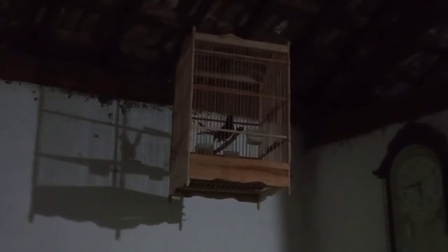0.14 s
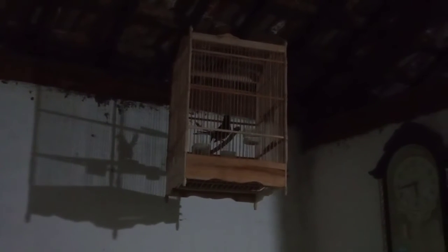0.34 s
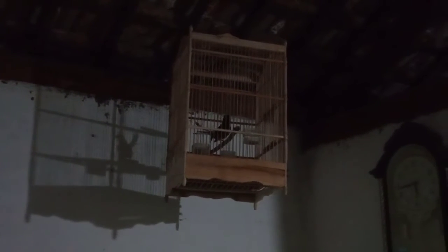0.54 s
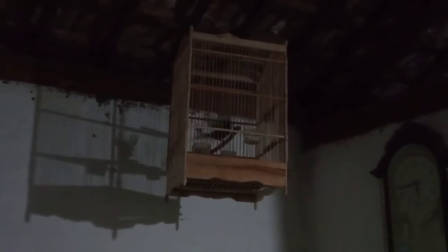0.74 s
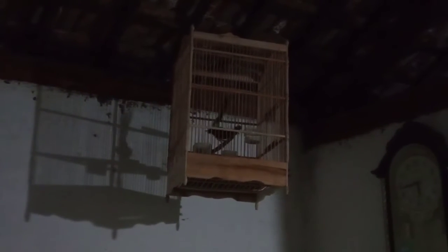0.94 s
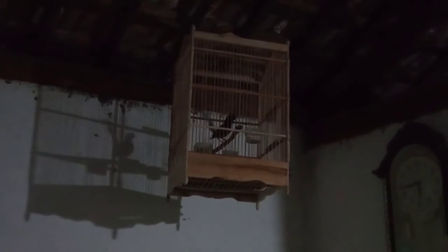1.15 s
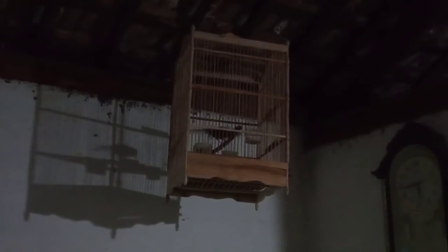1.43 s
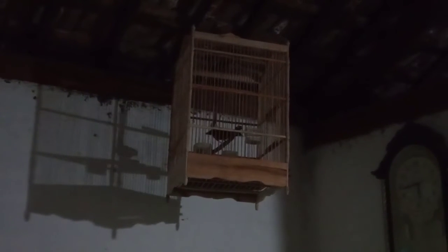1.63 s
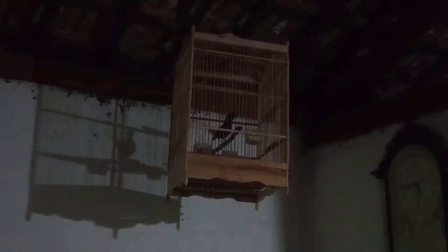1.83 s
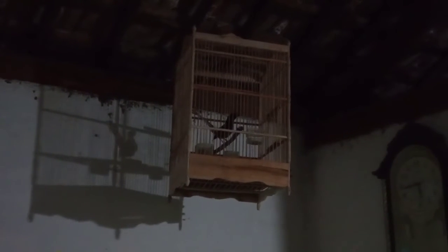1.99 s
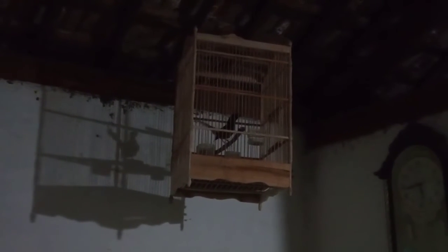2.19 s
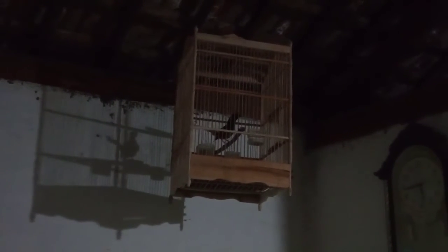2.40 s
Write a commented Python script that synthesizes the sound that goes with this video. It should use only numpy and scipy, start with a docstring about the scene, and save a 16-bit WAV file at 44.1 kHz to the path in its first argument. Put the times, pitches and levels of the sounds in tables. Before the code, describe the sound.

Small cage bird indoors, snapping tak-like chirps mixed with short whistled notes, faint insect pulsing behind

```python
"""A bare, echoing room at night, with a small caged bird.
The bird gives a run of sharp, dry "tak" chirps: bursts of grainy noise, each with a short bright ring.
Between them it whistles soft notes, near sines whose pitch is bent and warbled, some purer than others.
An insect pulses faintly and high in shaped noise, over a low rumble, steady hiss and a thin sizzle."""
import sys
import numpy as np
from scipy import signal
from scipy.fft import rfft, irfft
from scipy.io import wavfile

SR = 44100
rng = np.random.default_rng(int(sys.argv[2]) if len(sys.argv) > 2 else 0)


def store_wav(level_fs):
    """Save 16-bit WAV to argv[1]."""
    pcm = np.round(np.clip(np.atleast_2d(level_fs), -1, 1) * 32767)
    wavfile.write(sys.argv[1], SR, pcm.T.astype(np.int16))


N = 112454
TIME = np.arange(N) / SR
FREQS = np.maximum(np.fft.rfftfreq(N, 1 / SR), 1)
CUTOFF_HZ = 15750  # top of the sound


def from_db(db):
    """Decibels to gain."""
    return 10 ** (np.asarray(db) / 20)


def rms_one(x):
    """Scale to unit power."""
    return x / np.sqrt(np.mean(x ** 2) + 1e-20)


def at_hz(points, hz):
    """Read a table on a log-frequency axis."""
    f, value = np.transpose(points)
    return np.interp(np.log(hz), np.log(f), value)


def noise(gains):
    """Steady noise with the given gain per frequency; unit power."""
    return rms_one(irfft(rfft(rng.standard_normal(N)) * gains, N))


def noise_band(centre_hz, width_hz):
    """Unit-power noise under a bell-shaped curve around one frequency."""
    return noise(np.exp(-2 * ((FREQS - centre_hz) / width_hz) ** 2))


def below(hz):
    """Smooth gain curve: one well under the corner, half at it, near zero well above."""
    return 1 / (1 + (FREQS / hz) ** 6)


def hiss():
    """Faint steady noise with a fixed colour."""
    # colour of the hiss: pitch_hz [Hz], relative level_db [dB per Hz]
    hiss_colour = [(400, -11.5), (900, -25), (2000, -26), (2800, -24.5), (4000, -10.5), (5000, -16.5),
                   (5900, -4), (7300, -9), (8400, -29), (9600, -16), (13000, -27.5), (16000, -36.5)]
    return from_db(-68.5) * noise(from_db(at_hz(hiss_colour, FREQS)))


def rumble():
    """Low noise whose overlapping bands swell and sink independently, under one overall level curve."""
    # colour of the rumble: pitch_hz [Hz], relative level_db [dB per Hz]
    rumble_colour = [(25, -46), (50, -20.5), (110, 1), (160, 1.5), (220, 1), (350, 1.5), (500, -24.5),
                     (800, -54), (2000, -51)]
    # overall level of the rumble: time_s [s], level_db [dB]
    rumble_level = [(0.0, -63.5), (0.11, -78.5), (0.26, -61.5), (0.51, -67), (0.55, -85.5), (0.75, -63),
                    (0.82, -76), (0.93, -65.5), (1.33, -84.5), (1.38, -67), (1.9, -66), (2.11, -78),
                    (2.43, -64), (2.55, -65.5)]
    swing_db, swings_up_to_hz = 4, 6
    coloured = rfft(rng.standard_normal(N)) * from_db(at_hz(rumble_colour, FREQS))
    centres = np.linspace(40, 600, 13)
    bands = 0
    for pick in np.eye(len(centres)):
        band = irfft(coloured * np.interp(FREQS, centres, pick), N)
        bands = bands + band * from_db(swing_db * noise(below(swings_up_to_hz)))
    level_db = np.interp(TIME, *np.transpose(rumble_level))
    return from_db(level_db) * rms_one(bands)


def sizzle():
    """A thin band of high hiss, clearest at the start."""
    # level of the sizzle: time_s [s], level_db [dB]
    sizzle_level = [(0, -73), (.2, -72), (.32, -83), (2.55, -78)]
    level_db = np.interp(TIME, *np.transpose(sizzle_level))
    return from_db(level_db) * noise_band(9530, 540)


def insect():
    """A faint high rasp: coloured noise that swells about five times a second, the pulses added as power."""
    # insect pulses: start_s [s], level_db [dB]
    insect_pulses = [(-.17, -53), (0.0, -52.5), (0.222, -50.5), (0.428, -51), (.64, -54.5), (.845, -53.5),
                     (1.05, -56.5), (1.247, -52), (1.46, -50.5), (1.671, -54.5), (1.877, -54.5),
                     (2.09, -57), (2.298, -49), (2.51, -45)]
    # colour of the rasp: pitch_hz [Hz], relative level_db [dB per Hz]
    insect_colour = [(2500, -43), (4000, -8), (5200, -28), (5600, 12.5), (5880, 22), (6120, 8.5),
                     (6450, -64), (7400, -3.5), (8400, -52.5), (9600, -19), (10900, -17), (11800, -2),
                     (12800, -33), (16000, -50)]
    attack_s, hold_s, release_s = 0.029, 0.044, 0.09
    power = 0
    for start_s, level_db in insect_pulses:
        age = np.maximum(TIME - start_s, 0)
        rise = np.minimum(age / attack_s, 1)
        fall = np.exp(-np.maximum(age - attack_s - hold_s, 0) / release_s)
        power = power + (from_db(level_db) * rise * fall) ** 2
    return np.sqrt(power) * noise(from_db(at_hz(insect_colour, FREQS)))


def room(x, direct_db):
    """Direct sound plus dense reflections, dying soonest in the top treble; keeps the power."""
    # time for the reflections to fall by 60 dB: pitch_hz [Hz], t60_s [s]
    room_t60 = [(300, 1), (750, 0.37), (1500, 0.48), (2800, 0.35), (5500, 0.36), (10000, 0.31),
                (16000, 0.25)]
    build_s = 0.001
    t = TIME[:SR]
    white = rfft(rng.standard_normal(SR))
    centres = np.geomspace(250, 16000, 7)
    tail = 0
    for hz, pick in zip(centres, np.eye(len(centres))):
        # the one-second tail has bins 1 Hz apart
        share = np.interp(np.log(np.arange(len(white)) + 1), np.log(centres), pick)
        tail = tail + irfft(white * share, SR) * from_db(-60 * t / at_hz(room_t60, hz))
    tail = tail * (1 - np.exp(-t / build_s))
    wet = signal.fftconvolve(x, tail)[:N]
    mix = from_db(direct_db) * rms_one(x) + rms_one(wet)  # direct level is relative to the reflections
    return rms_one(mix) * np.sqrt(np.mean(x ** 2))


def whistle(overtone_db, curve):
    """A near sine on a pitch curve with a fast uneven warble and faint overtones, heard through the room."""
    # how well the throat passes overtones: pitch_hz [Hz], gain_db [dB]
    throat = [(3300, 6), (3550, 22), (3900, -16), (4200, 20.5), (4450, -13), (4700, -2), (6200, -15),
              (7000, 10), (8200, -23), (9300, -2), (11000, -14), (14000, -41)]
    fade_s, warble_up_to_hz = 0.0063, 129.7
    soft_note_db = -60.5      # note level at which the overtone level is given
    overtone_follows = 0.26   # share of the note's swing in dB that its overtones follow
    times, *columns = np.transpose(curve)
    pitch_hz, level_db, warble_hz = [np.interp(TIME, times, column) for column in columns]
    inside_s = np.minimum(TIME - times[0], times[-1] - TIME)
    gate = np.clip(inside_s / fade_s + .5, 0, 1)

    warble = rms_one(np.tanh(noise(below(warble_up_to_hz))))
    phase = 2 * np.pi * np.cumsum(pitch_hz + warble_hz * warble) / SR
    overtones = 0
    for k in range(2, 6):
        overtone_hz = k * pitch_hz
        partial = from_db(at_hz(throat, overtone_hz)) * np.sin(k * phase)
        overtones = overtones + partial * (overtone_hz < CUTOFF_HZ)

    overtone_level_db = soft_note_db + overtone_db + overtone_follows * (level_db - soft_note_db)
    tone = from_db(level_db) * np.sin(phase) + from_db(overtone_level_db) * overtones
    return room(np.sqrt(2) * gate * tone, direct_db=-2)  # root two: levels are those of a sine's rms


def whistles():
    """The bird's soft notes, some overlapping, each with its own pitch, level and warble curve."""
    # notes: overtone_db [dB], curve of (time_s [s], pitch_hz [Hz], level_db [dB], warble_hz [Hz rms])
    notes = [ (-49, [(.025, 3900, -53, 24.6), (.043, 4103, -48, 25), (.058, 3960, -62, 24.9)]),
             (-10, [(.052, 2223, -59, 20), (.12, 2235, -49, 20), (.15, 2300, -47.5, 15),
             (.215, 2277, -47.5, 20), (.243, 2217, -30.5, 20), (.275, 2123, -52.5, 12),
             (.31, 2107, -48, 9.4)]), (-28, [(.33, 2200, -60, 25), (.38, 2104, -55, 25),
             (.44, 2160, -73, 25), (.5, 2266, -53, 25)]), (-26, [(.515, 2331, -54, 40),
             (.62, 2470, -50, 40), (.676, 2677, -52.5, 30), (.682, 2657, -30, 8.6), (.7, 2682, -40, 4.3),
             (.745, 2743, -42.5, 6.9), (.79, 2768, -42, 11)]), (-13, [(.953, 1734, -48.5, 10),
             (.997, 1720, -52, 15), (1.008, 1820, -36.5, 29)]), (-32, [(1.008, 1818, -35.5, 35.6),
             (1.045, 1818, -40, 45), (1.11, 1830, -43, 55)]), (-24, [(1.02, 2044, -41, 111.2),
             (1.05, 2092, -47.5, 117), (1.12, 2110, -40, 122)]), (-25, [(1.265, 1684, -48.5, 100.8),
             (1.28, 1828, -45, 81), (1.335, 1884, -41.5, 80), (1.39, 1928, -65, 79)]),
             (-28, [(1.295, 2165, -59, 70), (1.32, 2213, -41.5, 50), (1.35, 2186, -55, 60)]),
             (-22, [(1.365, 3414, -54, 45), (1.378, 3560, -42, 85), (1.398, 3480, -39.5, 20),
             (1.418, 3470, -30.5, 15), (1.442, 3602, -30, 15), (1.485, 3520, -32.5, 15),
             (1.53, 3527, -30, 30), (1.562, 3448, -37, 15)]), (-46, [(2.147, 7330, -55, 150),
             (2.152, 6730, -36.5, 150), (2.16, 6240, -38, 150)])]
    return sum(whistle(*note) for note in notes)


def chirps():
    """Each chirp is a grainy broadband crack, followed at once by a short bright ring."""
    # chirps: start_s [s], level_db [dB], decay_s [s], bass_db [dB], treble_db [dB],
    # ring_hz [Hz], ring_db [dB relative to the crack]
    chirp_list = [(0.3152, -35, 0.0097, -6, 6, 6200, -1), (0.567, -31.5, 0.021, 3.5, 4, 6250, -7.5),
                  (0.767, -30.5, 0.0051, 8, 5.5, 5600, 1), (0.8465, -36.5, 0.002, 8.5, -2.5, 5000, -7),
                  (1.014, -36.5, 0.01, 8.5, 0, 5000, -2), (1.409, -32.5, 0.01, 5, -2, 5700, -6.5),
                  (1.469, -37, 0.0089, 12.5, -6, 5300, -6), (1.716, -34, 0.0065, 14, -4, 4700, -5.5),
                  (2.077, -31.5, .008, -31, 5, 5600, -0.5), (2.147, -35, 0.0034, -13, 4.5, 6600, -6.5)]
    # colour common to the cracks: pitch_hz [Hz], relative level_db [dB per Hz]
    chirp_colour = [(150, -65), (400, -31), (530, -41), (700, -19.5), (1000, -5.5), (1500, -8),
                    (2100, -6.5), (2900, -1.5), (4000, 2), (5500, 1.5), (6500, 0.5), (7400, -10),
                    (8500, -14), (10200, -7.5), (12000, -22), (15500, -19.5)]
    attack_s, grain_db, grains_up_to_hz = 0.00096, 1.5, 1800
    ring_delay_s, ring_length_s, ring_width_hz = 0.011, .002, 700
    span_s = 0.049  # a chirp's level is its energy spread over this time
    out = 0
    for start_s, level_db, decay_s, bass_db, treble_db, ring_hz, ring_db in chirp_list:
        age = np.maximum(TIME - start_s, 0)
        grain = from_db(grain_db * noise(below(grains_up_to_hz)))
        envelope = (1 - np.exp(-age / attack_s)) * np.exp(-age / decay_s)
        burst = noise(1) * grain * envelope

        tilt_db = bass_db * below(837) + treble_db * (1 - below(6740))
        crack = irfft(rfft(burst) * from_db(at_hz(chirp_colour, FREQS) + tilt_db), N)

        ring_swell = np.exp(-((age - ring_delay_s) / ring_length_s) ** 2) * (age > 0)
        ring = noise_band(ring_hz, ring_width_hz) * ring_swell
        call = rms_one(rms_one(crack) + from_db(ring_db) * rms_one(ring))
        out = out + from_db(level_db) * call * np.sqrt(span_s * SR / N)
    return room(out, direct_db=-6)


def scene():
    """Background, insect and bird summed to one channel."""
    background = hiss() + rumble() + sizzle()
    bird = whistles() + chirps()
    return (background + insect() + bird)[None]


def record(dry):
    """The top is cut steeply."""
    steep_lowpass = signal.ellip(12, .1, 80, CUTOFF_HZ, fs=SR, output="sos")
    return signal.sosfilt(steep_lowpass, dry)


dry = scene()
out = record(dry)
store_wav(out)
```